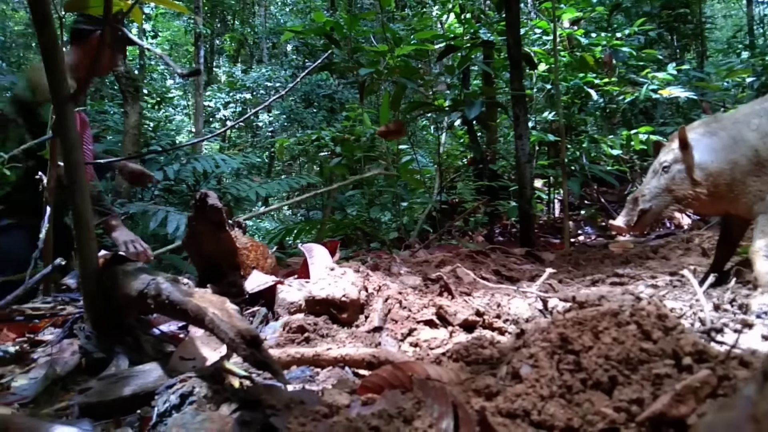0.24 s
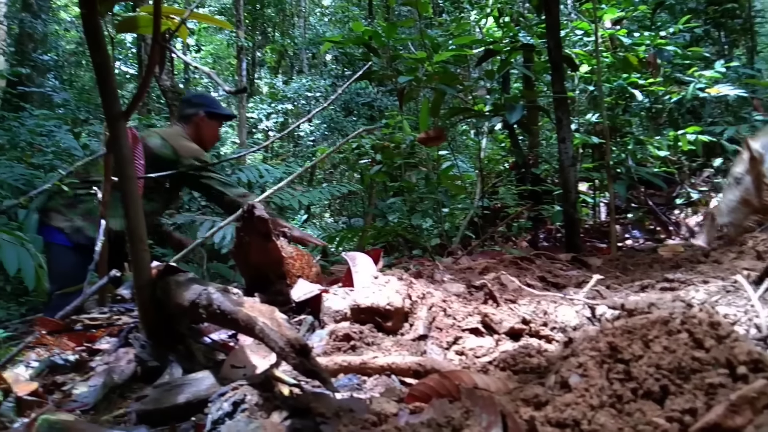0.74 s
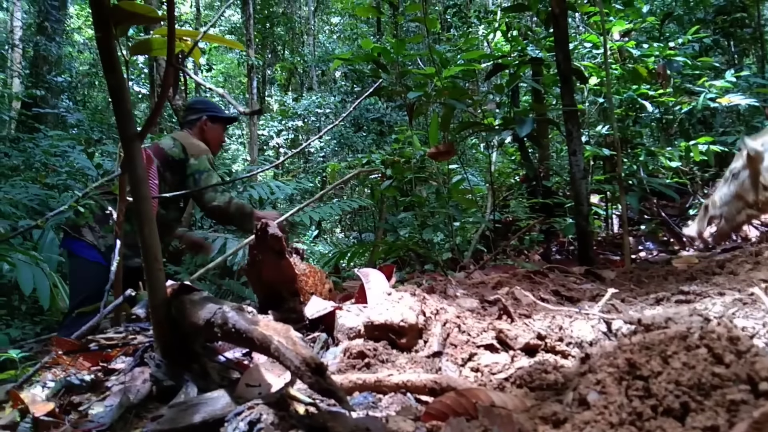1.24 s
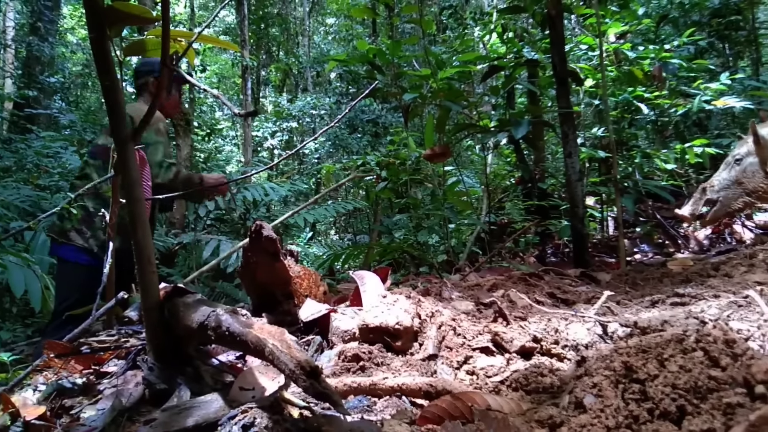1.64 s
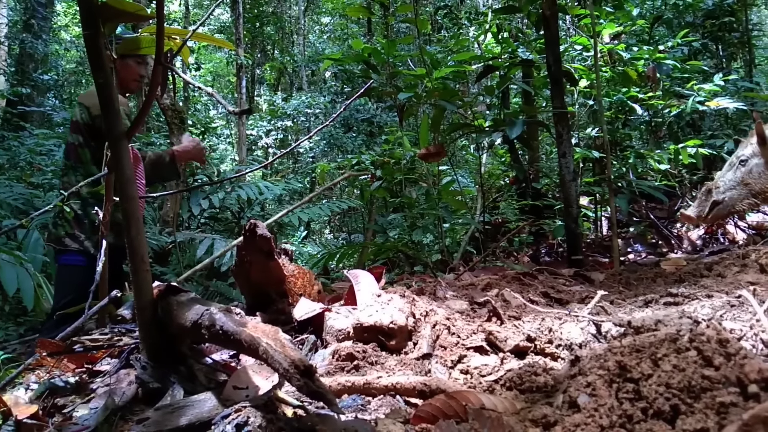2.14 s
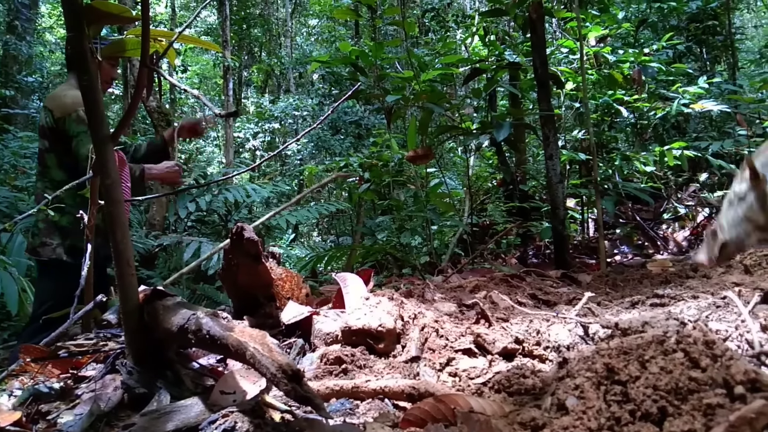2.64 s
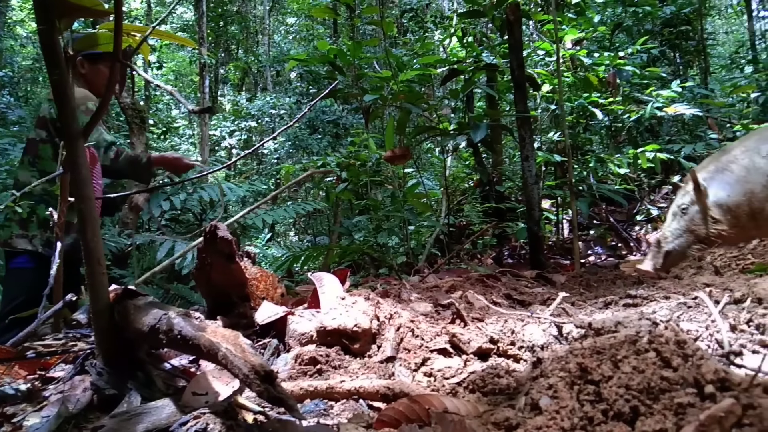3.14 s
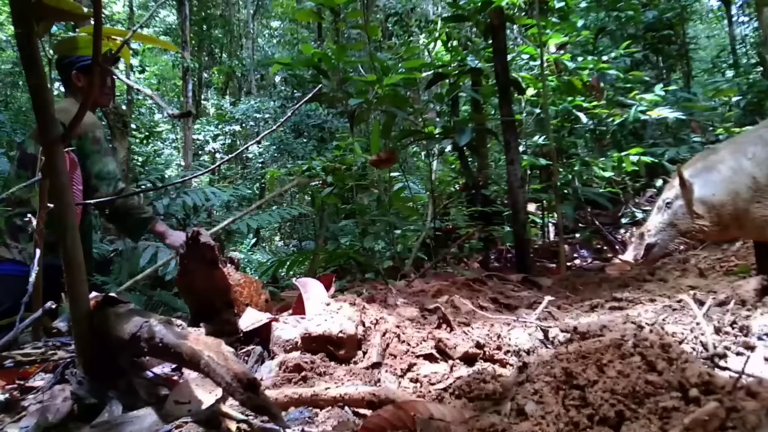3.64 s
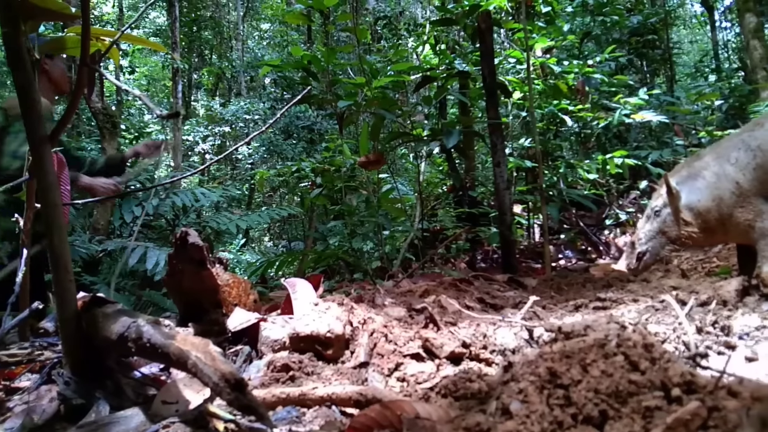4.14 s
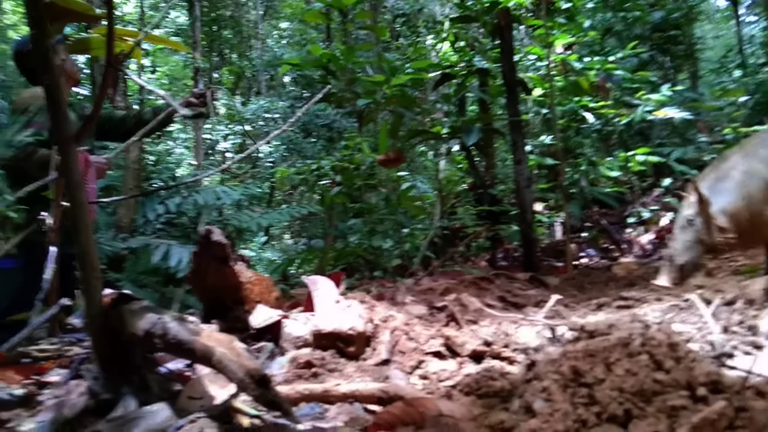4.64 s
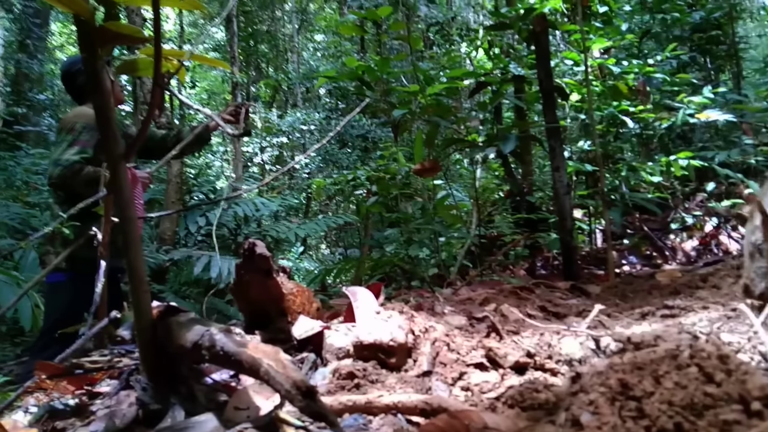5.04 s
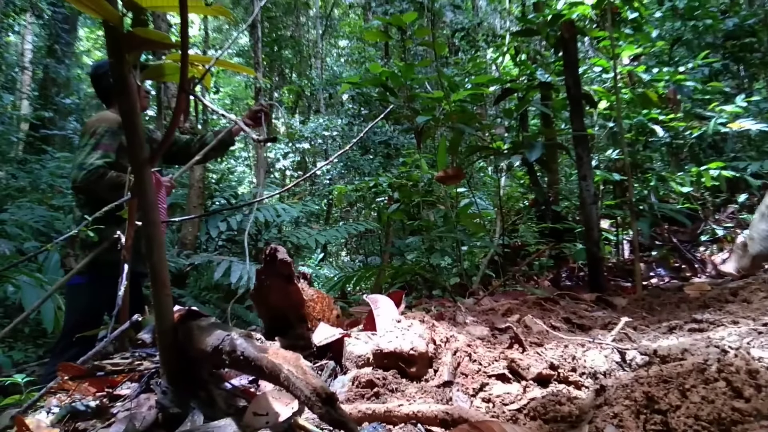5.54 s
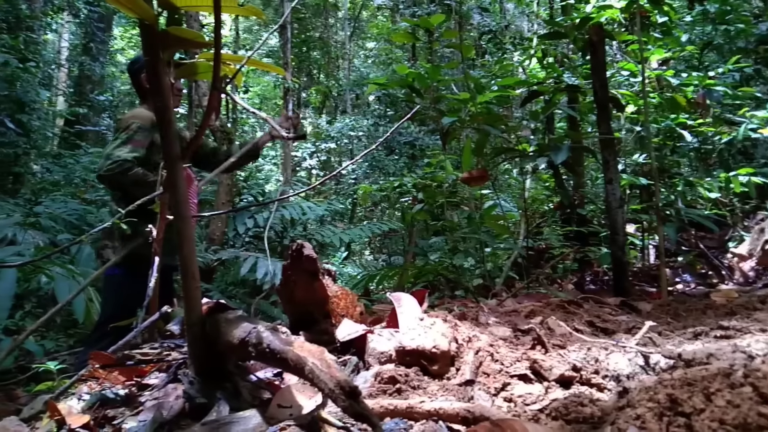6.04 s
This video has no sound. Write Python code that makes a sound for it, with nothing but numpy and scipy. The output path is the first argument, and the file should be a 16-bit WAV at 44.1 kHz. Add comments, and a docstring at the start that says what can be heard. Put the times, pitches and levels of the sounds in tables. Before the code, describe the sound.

Shrill cicadas hiss steadily in a forest, one nearer insect whining in a slow, slight waver. Soil scuffs briefly and a pig gives tiny soft grunts, then a twig snaps. Four low, rattling growls follow with pauses between them, the first brushed by leaves. Light patter and small taps dot the gaps. Outdoor microphone at moderate distance, with a faint dull woodland tail.

```python
"""Throughout: forest air and far cicadas (shaped noise), a near cicada (swept sines), patter (short bursts).
From 0.03 s: a scuffle in the soil, then soft grunts; later a few noise-burst snaps and taps.
From 0.93 s: a snared wild pig growls four times, low and rattling; slow throat flaps ring its long airway
and a nasal resonance comes and goes. A brush of leaves stirs during the first growl."""
import sys
import numpy as np
from scipy import signal
from scipy.fft import rfft, irfft, next_fast_len
from scipy.io import wavfile
from scipy.ndimage import map_coordinates

SR = 44100
rng = np.random.default_rng(int(sys.argv[2]) if len(sys.argv) > 2 else 0)


def waveform_to_disk(signal):
    """Save audio, clipped to [-1, 1], as 16-bit WAV at the path in sys.argv[1]."""
    frames = np.transpose(np.atleast_2d(signal))
    scaled = np.clip(frames, -1, 1) * 32767
    samples = np.round(scaled).astype(np.int16)
    wavfile.write(sys.argv[1], SR, samples)


N = 276948
TIME = np.arange(N) / SR


def from_db(db):
    """Decibels to gain."""
    return 10 ** (np.asarray(db) / 20)


def rms_one(x):
    """Scale to unit rms."""
    return x / np.sqrt(np.mean(x ** 2) + 1e-20)


def in_time(rows, t=TIME):
    """Interpolate the columns of a curve table at times t."""
    s, *columns = np.transpose(rows)
    return [np.interp(t, s, c) for c in columns]


def drift(knots_per_s):
    """Smooth random curve, rms 1."""
    knots = rng.standard_normal(2000)
    return rms_one(map_coordinates(knots, [TIME * knots_per_s], order=2, mode="wrap"))


def colour(x, spectrum):
    """Shape x by a spectrum, interpolated over log frequency; rms 1."""
    hz, db = np.transpose(spectrum)
    size = next_fast_len(N)
    bins_hz = np.arange(size // 2 + 1) * SR / size
    gain = from_db(np.interp(np.log(bins_hz + 1), np.log(hz), db))
    return rms_one(irfft(rfft(x, size) * gain, size)[:N])


def cut(x, hz, kind, order=2):
    """Butterworth filter."""
    sos = signal.butter(order, np.minimum(hz, SR / 2 - 1), kind, fs=SR, output="sos")
    return signal.sosfilt(sos, x + 1e-18)


def resonate(x, hz, width_hz):
    """One two-pole resonance, gain 1 on top."""
    r = np.exp(-np.pi * width_hz / SR)
    zeros = np.array([1, 0, -1]) * (1 - r * r) / 2
    poles = [1, -2 * r * np.cos(2 * np.pi * hz / SR), r * r]
    return signal.lfilter(zeros, poles, x + 1e-18)


def body(x, modes):
    """Resonances in parallel."""
    return sum(from_db(db) * resonate(x, hz, width_hz) for hz, width_hz, db in modes)


def glide(x, hz, width_hz):
    """A resonance whose centre follows a curve: shift to 0 Hz, smooth, shift back."""
    turn = np.exp(2j * np.pi * np.cumsum(hz) / SR)
    return (turn * signal.lfilter([1], [1, -np.exp(-np.pi * width_hz / SR)], x / turn)).real


def even(x, window_s=.075):
    """Level x over a few flaps; single flaps keep their shape and the tail dies away."""
    window = np.hanning(int(window_s * SR))
    power = signal.fftconvolve(x ** 2, window / window.sum(), "same")
    return x / np.sqrt(np.abs(power) + .04 * np.mean(x ** 2))


def add(out, s, sound, peak_db):
    """Mix a short sound in at a time and peak level."""
    part = out[max(0, round(s * SR)):][:len(sound)]
    part += (from_db(peak_db) * sound / np.abs(sound).max())[:len(part)]


# forest air spectrum: f/Hz, relative density/(dB per Hz)
AIR_SPECTRUM = [(25, -69), (70, -4), (130, -7), (265, -1.5), (345, -10.5), (510, 2), (650, -4), (1500, -2),
                (2600, -2.5), (3300, -8.5), (4300, 1.5), (7000, -5), (11000, -26.5), (15300, -17)]


def forest_air(level_db=-55):
    """Steady noise with the spectrum of the forest air."""
    return from_db(level_db) * colour(rng.standard_normal(N), AIR_SPECTRUM)


# far cicada spectrum: f/Hz, relative density/(dB per Hz)
CHORUS_SPECTRUM = [(4500, -31.5), (5200, -10), (5750, -8), (6020, 1), (6250, -3.5), (6480, -4),
                   (6650, -5.5), (6830, -9), (7100, 0), (7400, -0.5), (7680, -3.5), (8000, -11),
                   (8500, -23.5), (9500, -41)]
# far cicada level before trim: t/s, level/dB
CHORUS_LEVEL_CURVE = [(0.0, -44), (2.38, -45), (2.59, -44), (3.51, -46), (3.62, -44.5), (4.65, -45.5),
                      (4.9, -43.5), (5.18, -45.5), (6.28, -45.5)]


def far_cicadas(flutter_db=1.0, trim_db=-0.5):
    """Many far insects merge into a fluttering hiss."""
    level_db, = in_time(CHORUS_LEVEL_CURVE)
    hiss = colour(rng.standard_normal(N), CHORUS_SPECTRUM)
    return hiss * from_db(level_db + trim_db + flutter_db * drift(120))


CARRIER_HZ, CARRIER_DB, CARRIER_SWELL_DB = 5435, -55.5, 3
CYCLE_S, LOWEST_AT_S, SWEEP_HZ = 1.85, 0.42, 20  # sweep is +/- about the carrier
RISE_SHARE = .58  # the climb takes longer than the fall
# near cicada sidebands: offset from carrier/Hz, mean level/dB, swell with the cycle/dB
CICADA_SIDEBANDS = [(-513, -67, 0), (-252, -61.5, -3), (268, -57, -2), (520, -60.5, 2.5),
                    (778, -58.5, -1.5), (1055, -63, 0.5)]


def near_cicada(fade_db=3.5, waver_hz=6):
    """Tymbal pulses give a comb of lines sweeping together; the carrier is loudest at both turns."""
    cycle_share = (TIME - LOWEST_AT_S) / CYCLE_S % 1
    phase = np.pi * np.interp(cycle_share, [0, RISE_SHARE, 1], [0, 1, 2])
    carrier_hz = CARRIER_HZ - SWEEP_HZ * np.cos(phase)
    out = 0
    for offset_hz, db, swell_db in [(0, CARRIER_DB, CARRIER_SWELL_DB)] + CICADA_SIDEBANDS:
        hz = carrier_hz + offset_hz + waver_hz * drift(50)
        gain = from_db(db + swell_db * np.cos(2 * phase) + fade_db * drift(9))
        out = out + gain * np.sqrt(2) * np.sin(2 * np.pi * np.cumsum(hz) / SR)
    return out


def patter(count=700, spread_db=3.0, base_db=-56, t60_s=0.035, sharpness=12, tilt_db_per_octave=1.22):
    """Small things land on the foliage, each leaf shivering briefly at its own pitch."""
    out, t = np.zeros(N), TIME[:SR // 12]
    shiver = from_db(-60 * t / t60_s) * (1 - np.exp(-t / 0.0018))
    for when, pitch, size in rng.random((count, 3)):
        octaves = 2.8 * pitch
        hz = 740 * 2 ** octaves
        size_db = spread_db * min(-np.log(size), 2.8)
        leaf = resonate(rng.standard_normal(len(t)) * shiver, hz, hz / sharpness)
        add(out, when * TIME[-1], leaf, base_db + size_db + tilt_db_per_octave * octaves)
    return out


def brush(stroke, spectrum, crinkle_db=3.0):
    """Crinkling noise with a spectrum, heard for the span of a level curve."""
    stroke_db, = in_time(stroke)
    moving = (TIME > stroke[0][0]) & (TIME < stroke[-1][0])
    crinkle = rng.standard_normal(N) * from_db(crinkle_db * drift(200))
    return moving * from_db(stroke_db) * colour(crinkle, spectrum)


# scuffle: t/s, level/dB
SCUFFLE_LEVEL = [(.03, -77), (.06, -56), (.11, -54.5), (.16, -56), (.2, -58), (.27, -63)]
# loose soil spectrum: f/Hz, relative density/(dB per Hz)
SOIL_SPECTRUM = [(90, -14), (170, 3.5), (300, -12), (600, -5.5), (800, -4), (1200, -9), (2300, -4.5),
                 (4000, -16), (9000, -31)]


def scuffle():
    """Loose soil rubs as crinkling, low-weighted noise."""
    return brush(SCUFFLE_LEVEL, SOIL_SPECTRUM)


# throat resonances: f/Hz, width/Hz, gain/dB
THROAT_MODES = [(257.7, 50, 10.5), (340, 29, -17)]
# single soft grunts: t/s, peak/dB
GRUNT_TIMES = [(0.055, -48), (0.135, -44.5), (0.15, -41.5), (0.171, -46.5), (4.311, -53)]


def grunts():
    """Lone flaps, each an impulse ringing the throat."""
    out = np.zeros(N)
    flap = cut(body(signal.unit_impulse(SR // 8), THROAT_MODES), 350, "low")
    for s, db in GRUNT_TIMES:
        add(out, s, flap, db)
    return out


# twig snaps: t/s, peak/dB
TWIG_SNAPS = [(0.6988, -41), (2.4418, -53), (2.8936, -46), (3.5992, -50), (3.9409, -48), (4.339, -49),
              (4.8939, -52), (5.67, -51)]


def snaps(t60_s=0.065):
    """Dry twigs crack as decaying high-band noise."""
    out, t = np.zeros(N), TIME[:SR // 8]
    for s, db in TWIG_SNAPS:
        burst = rng.standard_normal(len(t)) * from_db(-60 * t / t60_s)
        add(out, s, cut(burst, [4000, 10500], "band"), db)
    return out


# taps on leaves and ground: t/s, peak/dB, f/Hz
LEAF_TAPS = [(0.928, -45, 1000), (1.619, -41, 2190), (1.817, -44, 1013), (1.996, -40, 5500),
             (3.273, -41.5, 980), (3.526, -39.5, 2360), (4.175, -45, 865), (5.032, -39, 840),
             (5.122, -46, 1520), (5.535, -38.5, 5400), (5.728, -46.5, 790)]


def taps(t60_s=0.026, sharpness=9):
    """A short noise burst rings one broad resonance per tap."""
    out, t = np.zeros(N), TIME[:SR // 8]
    for s, db, hz in LEAF_TAPS:
        burst = rng.standard_normal(len(t)) * from_db(-60 * t / t60_s)
        add(out, s, resonate(burst, hz, hz / sharpness), db)
    return out


def flaps(t, rates, rebound_s, rebound, jitter_s=0.00095, uneven_db=5.5, rebound_hz=380):
    """The throat slaps shut once a cycle; slack tissue rebounds and closes again more softly."""
    per_s, = in_time(rates, t)
    sounding = (t >= rates[0][0]) * (t <= rates[-1][0])
    cycles = np.cumsum(per_s * sounding) / SR
    shut = t[np.flatnonzero(np.diff(np.ceil(cycles)))]
    chance = rng.standard_normal((len(shut), 4))
    shut = shut + jitter_s * chance[:, 0]
    again = shut + rebound_s + jitter_s * chance[:, 1]
    # fast flaps leave no time for a rebound
    leeway = np.clip(1 / (np.interp(shut, t, per_s) * rebound_s) - 1.5, 0, 1)
    first, second = np.zeros((2, len(t) + 1))
    first[np.searchsorted(t, shut)] = from_db(uneven_db * chance[:, 2])
    second[np.searchsorted(t, again)] = rebound * leeway * from_db(uneven_db * chance[:, 3])
    return (first + cut(second, rebound_hz, "low"))[:-1]


def swell(t, start, end, attack_db_per_s=302, release_db_per_s=260):
    """Attack before start and release after end, in dB."""
    return -attack_db_per_s * np.maximum(start - t, 0) - release_db_per_s * np.maximum(t - end, 0)


# mouth resonances: f/Hz, width/Hz, gain/dB
MOUTH_MODES = [(930, 120, -15), (1227, 310, -5), (2160, 230, -19)]
CHEST_WIDTH_HZ, LOOSE_BELOW_PER_S = 22.7, 40  # wider when flaps are slow and the throat is loose
CHEST_FOLLOWS = 1.15  # chest pitch follows the snout by this power of its ratio to the mean
SNOUT_WIDTH_HZ = 16.8
WALL_SAG_HZ_PER_S = 90  # the wall sinks in pitch as the growl runs out of air


def growl(rates, shape, slack, rasp=0.018, rush_s=0.0074, slack_hz=185, taut_hz=310, wall_width_hz=65):
    """Flaps and a little turbulence ring chest, throat, snout and mouth."""
    rebound_s, rebound, chest_hz, bass_edge_hz, wall_db, mouth_db = slack
    span = (TIME > rates[0][0] - .02) & (TIME < rates[-1][0] + .1)
    t, out = TIME[span], np.zeros(N)
    level_db, throat_db, snout_db, snout_hz = in_time(shape, t)
    level_db = level_db + swell(t, shape[0][0], shape[-1][0])
    pulses = flaps(t, rates, rebound_s, rebound)
    # pressure and rushing air die away for a few milliseconds after each flap
    pressure = signal.lfilter([1], [1, -np.exp(-1 / (rush_s * SR))], pulses)
    rush = pressure * rng.standard_normal(len(t))
    source = pulses + rasp * rush

    chest_width_hz = CHEST_WIDTH_HZ * max(1, LOOSE_BELOW_PER_S / np.median(in_time(rates, t)))
    chest_curve_hz = chest_hz * (snout_hz / snout_hz.mean()) ** CHEST_FOLLOWS
    chest = glide(source, chest_curve_hz, chest_width_hz)
    chest = even(cut(chest, [bass_edge_hz, 230], "band"))

    # the throat wall slackens as the pressure falls, so every flap droops in pitch
    tension_hz = (taut_hz - slack_hz) * np.minimum(pressure, 1)
    wall_hz = slack_hz + tension_hz - WALL_SAG_HZ_PER_S * (t - t.mean())
    wall = glide(cut(source, 80, "high"), wall_hz, wall_width_hz)
    throat = rms_one(body(source, THROAT_MODES)) + from_db(wall_db) * rms_one(wall)
    throat = even(cut(throat, 470, "low", order=4))

    snout = cut(glide(source, snout_hz, SNOUT_WIDTH_HZ), 540, "low", order=8)
    snout = even(cut(snout, 370, "high"))
    mouth = even(cut(body(rush, MOUTH_MODES), [700, 2800], "band"))
    head = from_db(snout_db) * (snout + from_db(mouth_db) * mouth)
    # the throat is mixed in with the opposite sign to chest and snout
    out[span] = from_db(level_db) * (chest - from_db(throat_db) * throat + head)
    return out


# one table per growl: t/s, flap rate/(1/s)
GROWL_FLAP_RATES = [
    [(0.931, 27.4), (1.03, 31.7), (1.12, 43.4), (1.24, 47), (1.31, 58), (1.39, 41), (1.53, 34)],
    [(2.441, 15.8), (2.52, 27.5), (2.6, 37.5), (2.77, 36.5), (2.88, 58), (3.0, 49.7), (3.125, 56)],
    [(4.447, 25.2), (4.58, 26.8), (4.67, 32), (4.81, 30.8), (4.92, 20.4)],
    [(5.753, 23.6), (5.82, 21.3), (5.97, 21.3), (6.2, 24), (6.235, 29.4), (6.28, 77)],
]
# one table per growl body: t/s, level/dB, throat/dB re level, snout/dB re level, snout f/Hz
GROWL_SHAPES = [
    [(0.965, -48, 3.5, -0.5, 482), (1.019, -36, -5, -12, 460), (1.041, -46, -1, -4, 464),
     (1.079, -40.5, -12, -5.5, 470), (1.147, -52.5, 4, -6.5, 497), (1.237, -42, -8.5, -20.5, 489),
     (1.321, -37.5, -3, -8, 492), (1.441, -47, 2.5, 1, 506), (1.48, -46.5, -20, -9, 493.8)],
    [(2.49, -46.5, 2.5, -5, 461), (2.542, -42.5, 0.5, -17, 459), (2.604, -39.5, -4, -6.5, 480),
     (2.676, -36.5, -5, -12, 460), (2.82, -37.5, -5, -5, 468), (2.838, -39, -4, -1.5, 492),
     (2.898, -42, -9, -13, 500), (2.976, -40.5, 0.5, -6, 517), (3.12, -45.5, -5.5, -10, 493)],
    [(4.45, -47.5, -1, -3.5, 451), (4.64, -44.5, -0.5, -2.5, 465), (4.676, -39, -13, -3.5, 440),
     (4.696, -42.5, 0.5, -7, 450), (4.754, -44.5, 0.5, -5.5, 447), (4.806, -39, -3.5, -19, 453),
     (4.832, -45.5, -1.5, -15, 452), (4.868, -41.5, -8, -16, 452), (4.9, -48.5, -10, -15, 453)],
    [(5.79, -46, -4, -18, 445), (5.956, -49, -7.5, -16, 470), (6.004, -42, -23, -34, 462),
     (6.016, -49.5, -5, -21, 443), (6.084, -40, -8, -15.5, 496), (6.114, -54, 1, -7, 505),
     (6.222, -41.5, -9.5, -7.5, 502.4), (6.234, -50, 15, 7, 497), (6.27, -51.5, -1, 1, 510)],
]
# one row per growl: rebound delay/s, full rebound strength/(0-1), mean chest f/Hz, bass edge f/Hz,
# throat wall/dB re throat modes, mouth/dB re snout
GROWL_SLACK = [(0.00983, 0.97, 131, 48, -7, -15.5), (0.0107, 1, 121, 88, -10, -12.5),
               (0.0066, 0.37, 123, 46, 0, -19), (0.008, 0.22, 124, 37, -2, -10)]


def growls():
    """Four growls, each with its own flap rates, resonances and slackness."""
    return sum(growl(*parts) for parts in zip(GROWL_FLAP_RATES, GROWL_SHAPES, GROWL_SLACK))


# brush through the leaves: t/s, level/dB
RUSTLE_LEVEL = [(1.12, -55), (1.18, -48.5), (1.27, -47.5), (1.33, -86)]
# leaf spectrum: f/Hz, relative density/(dB per Hz)
LEAF_SPECTRUM = [(1500, -5), (2900, -2.5), (3200, 2.5), (3500, -16), (3950, 7), (4300, -3), (5400, 6.5),
                 (7000, -8), (10000, -42)]


def rustle():
    """One brush of leaves, as crinkling treble noise."""
    return brush(RUSTLE_LEVEL, LEAF_SPECTRUM)


def forest(x, t60_s, wet_db):
    """Trunks scatter a faint, dull tail."""
    t = TIME[:SR]
    tail = cut(rng.standard_normal(SR), 3400, "low", order=1) * from_db(-60 * t / t60_s) * (t > .012)
    tail = tail / np.sqrt(np.sum(tail ** 2)) / 2  # wet_db is relative to this half-amplitude tail
    return x + from_db(wet_db) * signal.fftconvolve(x, tail)[:N]


def scene():
    """Pig and undergrowth among the trees, under the insects."""
    insects = far_cicadas() + near_cicada()
    undergrowth = forest(patter() + scuffle() + snaps() + taps() + rustle(), t60_s=.18, wet_db=-10.5)
    pig = forest(grunts() + growls(), t60_s=.35, wet_db=-17)
    return (forest_air() + insects + undergrowth + pig)[None]


def record(dry, cutoff_hz=15500):
    """Steep elliptic low-pass on the top."""
    return signal.sosfilt(signal.ellip(12, .1, 80, cutoff_hz, fs=SR, output="sos"), dry)


dry = scene()
out = record(dry)
waveform_to_disk(out)
```